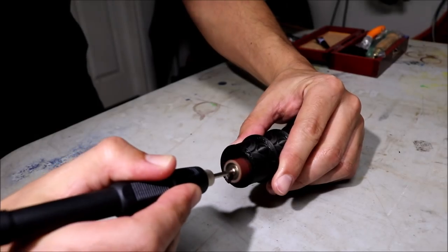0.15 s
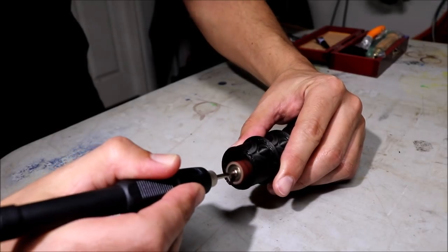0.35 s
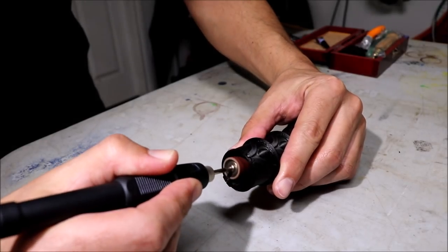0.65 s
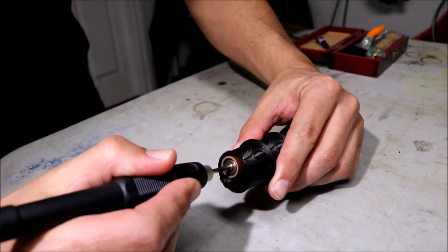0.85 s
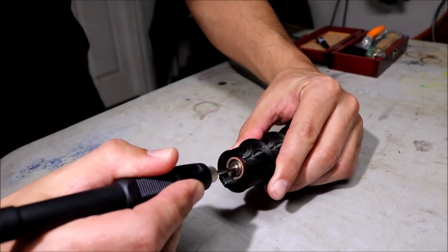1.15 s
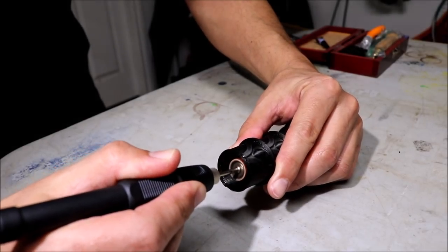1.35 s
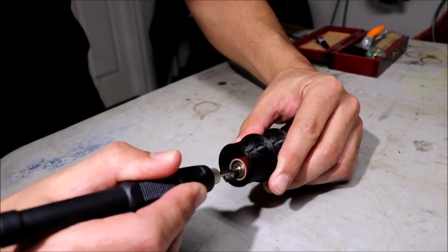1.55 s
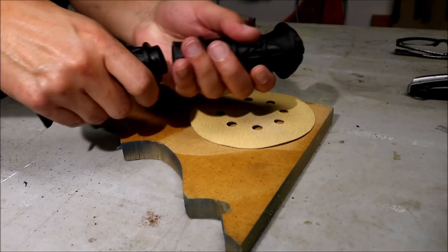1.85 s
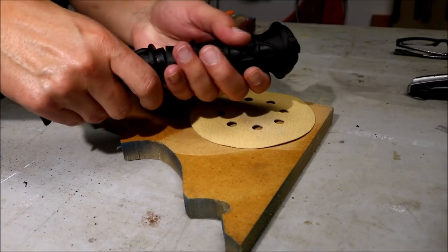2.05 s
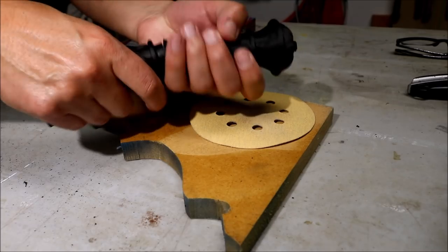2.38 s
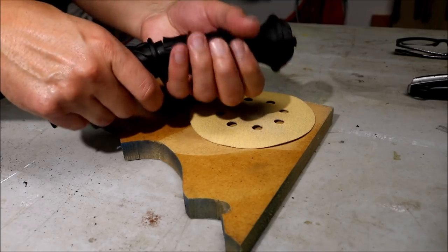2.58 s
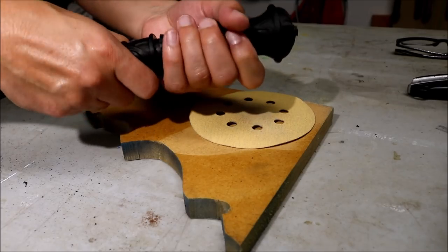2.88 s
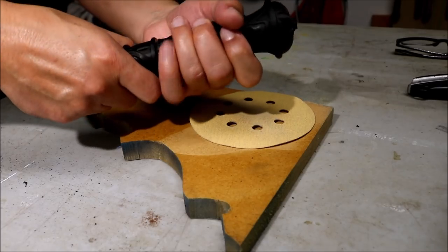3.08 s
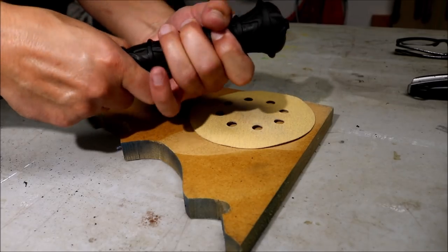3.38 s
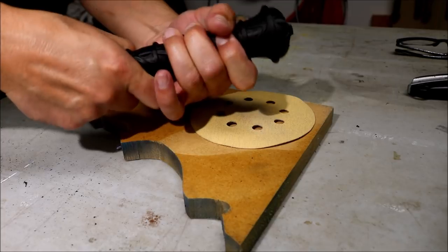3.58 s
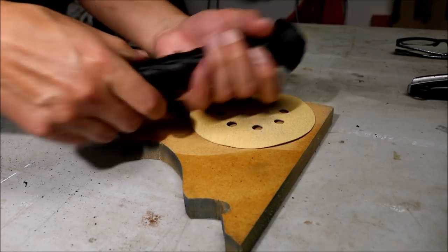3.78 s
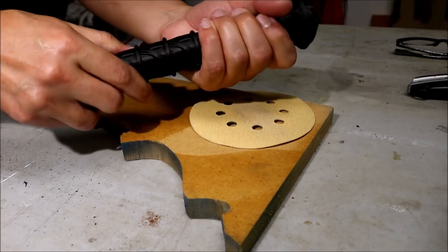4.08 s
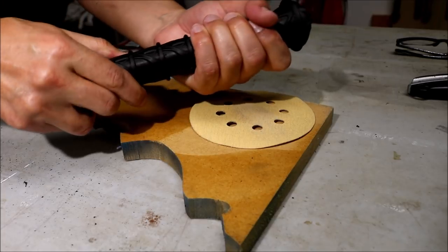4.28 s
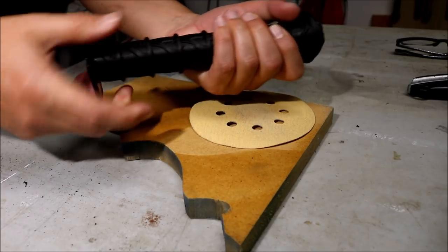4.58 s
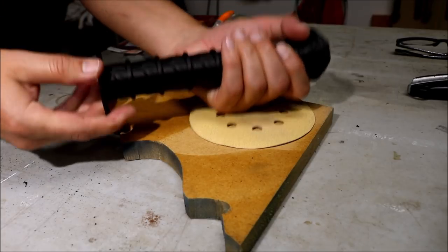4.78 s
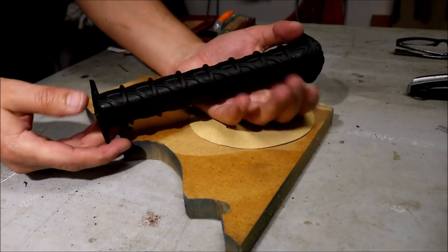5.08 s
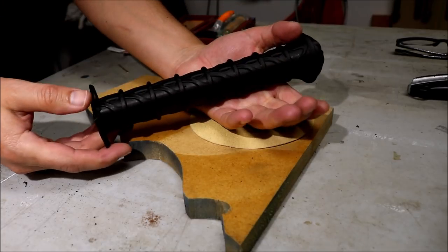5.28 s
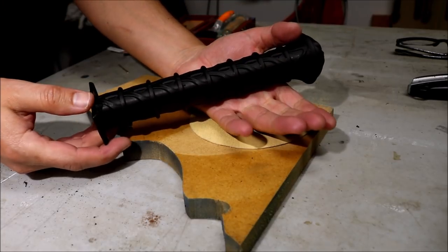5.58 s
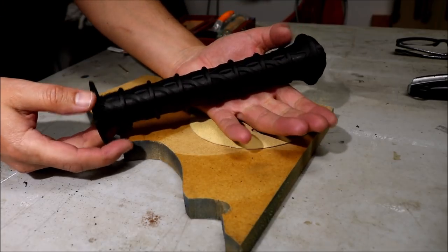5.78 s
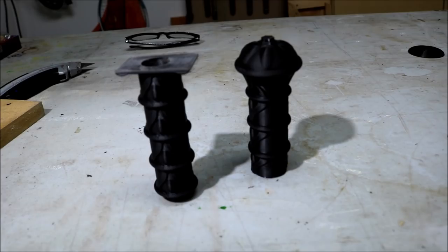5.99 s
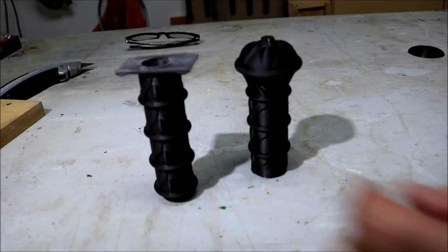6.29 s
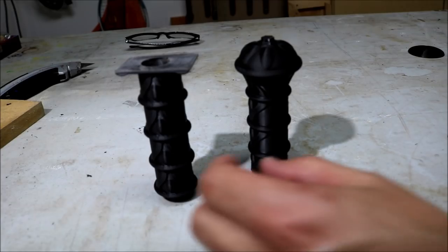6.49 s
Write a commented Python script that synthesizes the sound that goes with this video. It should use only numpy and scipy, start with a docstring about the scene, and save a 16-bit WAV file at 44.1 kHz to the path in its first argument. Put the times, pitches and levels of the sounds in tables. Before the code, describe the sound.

A rotary tool grinds inside a hollow plastic tube and slows under load, then hands rub and click tubes, then something hard bounces on a bench.

```python
"""A rotary tool grinds inside a hollow plastic tube and slows under load: drum blows and scouring ring the tube.
In a second scene hands twist and rub plastic tubes together, by stick-slip grains, small clicks and soft bumps.
In a third something hard is dropped on the bench: after a small first knock it bounces and rattles, its cracks
ringing the object and the bench.
Room noise with mains hum lies under all three, quieter in the first; the level dips briefly between scenes."""
import sys
import numpy as np
from scipy import signal
from scipy.fft import rfft, irfft
from scipy.io import wavfile
from scipy.ndimage import uniform_filter1d

SR = 44100
rng = np.random.default_rng(int(sys.argv[2]) if len(sys.argv) > 2 else 0)


def boost_factor(decibels):
    """Convert a level in decibels to a linear amplitude factor."""
    exponent = np.asarray(decibels, float) / 20
    return 10 ** exponent


def transcribe(u):
    """Save the signal u as a 16-bit wav file named by the first command-line argument.

    u: samples, shape (n,) or (channels, n), limited to [-1, 1]; the rate is SR.
    q: integer samples, one column per channel.
    """
    v = np.clip(np.atleast_2d(u).T, -1, 1)
    q = np.round(v * 32767).astype(np.int16)
    wavfile.write(sys.argv[1], SR, q)


N = 293039

# the scenes: (start [s], end [s], gain of room noise and hum [dB], extra gain of the second hum line [dB])
SCENES = [(-.1, 1.829, -9, 8.5), (1.862, 5.937, 3.5, -6), (5.969, 6.7, 5, 3)]


def rms_one(x):
    """Scale to rms 1."""
    return x / np.sqrt(np.mean(x ** 2) + 1e-20)


def in_time(rows):
    """Columns of a curve table, one value per sample."""
    s, *columns = np.transpose(rows)
    return [np.interp(np.arange(N) / SR, s, c) for c in columns]


def coloured(x, points):
    """Shape the spectrum by a (frequency [Hz], level [dB]) table, along log frequency."""
    size = x.shape[-1]
    hz = np.maximum(np.arange(size // 2 + 1) * SR / size, 1)
    table = np.array(points)
    gain_db = np.interp(np.log(hz), np.log(table[:, 0]), table[:, 1])
    return irfft(rfft(x) * boost_factor(gain_db), size)


def drift(rate, size=N):
    """Slow random wander: normal values of spread 1, drawn rate times a second and joined by lines."""
    steps = rng.standard_normal(int(size * rate / SR) + 2)
    return np.interp(np.arange(size) * rate / SR, np.arange(len(steps)), steps)


def resonances(x, table):
    """Parallel (centre [Hz], width [Hz], level [dB]) resonances, signs alternating."""
    out = 0
    for k, (hz, width, db) in enumerate(table):
        r = np.exp(-np.pi * width / SR)
        poles = [1, -2 * r * np.cos(2 * np.pi * hz / SR), r * r]
        band = signal.lfilter([(1 - r * r) / 2, 0, (r * r - 1) / 2], poles, x + 1e-18)
        out = out + (-1) ** k * boost_factor(db) * band
    return out


def ring(clicks, hz, t60):
    """A unit click sets a sine of initial height 1 ringing; it falls 60 dB in t60 seconds."""
    r = boost_factor(-60 / (t60 * SR))
    w = 2 * np.pi * hz / SR
    return signal.lfilter([0, np.sin(w)], [1, -2 * r * np.cos(w), r * r], clicks + 1e-18)


def clicks_at(times, sizes):
    """Single-sample blows."""
    out = np.zeros(N)
    out[np.round(np.asarray(times) * SR).astype(int)] = sizes
    return out


def grains(per_s, spread_db, size=N):
    """Random clicks of uneven size and either sign."""
    sizes = boost_factor(spread_db * np.minimum(rng.exponential(1, size), 4)) * rng.choice([-1, 1], size)
    return sizes * (rng.random(size) < per_s / SR)


def evened(x, span_s):
    """Level held at rms 1 over a sliding span."""
    return x / np.sqrt(uniform_filter1d(x ** 2, int(span_s * SR)) + 1e-14)


def gliding(x, hz, width):
    """A resonance whose centre moves, in blocks of 256 samples."""
    out, state = np.zeros_like(x), np.zeros(2)
    r = np.exp(-np.pi * width / SR)
    for i in range(0, len(x), 256):
        poles = [1, -2 * r * np.cos(2 * np.pi * hz[i] / SR), r * r]
        out[i:i + 256], state = signal.lfilter([1, 0, -1], poles, x[i:i + 256], zi=state)
    return out


def grinder():
    """The off-centre drum strikes the tube once a turn and scours it just after; the shaft hums its low orders."""
    # how hard the drum bites, as level of the tube: (time [s], level [dB])
    pressure = [(0.0, -23), (0.232, -23.5), (0.598, -22.5), (0.642, -26), (0.734, -20), (0.794, -26),
                (0.836, -18.5), (0.876, -24.5), (0.952, -22.5), (0.972, -25), (1.054, -23), (1.114, -29),
                (1.196, -24), (1.556, -25), (1.616, -22.5), (1.738, -25.5), (1.758, -23), (1.82, -30)]
    # shaft speed: (time [s], speed [turns/s])
    shaft_speed = [(0.0, 227), (0.034, 225.2), (0.3, 225.9), (0.476, 222), (0.7, 206.5), (0.81, 197.4),
                   (0.942, 180.2), (1.126, 173), (1.285, 165), (1.33, 165.9), (1.39, 162.4), (1.47, 162.7),
                   (1.612, 167.2), (1.698, 163.2), (1.77, 156), (1.83, 156.4)]
    # how the grip shares the pressure level among the rings:
    # (time [s], middle [dB], low [dB], second [dB], moving high ring centre [Hz])
    grip = [(0, -2, -13, -14, 3850), (.43, -5, -11, -13.5, 3810), (.5, 1.5, -11.5, -14.5, 3450),
            (.62, -1.5, -7.5, -12.5, 4050), (.73, -9, -13, -13.5, 3300), (.83, -6, -10, -9.5, 3770),
            (.93, -5, -8.5, -7.5, 3670), (1.04, -10, -9.5, -13.5, 3830), (1.27, -5, -5.5, -9.5, 4140),
            (1.4, -8, -8, -19, 3980), (1.53, -6, -11.5, -14.5, 3700), (1.6, -4.5, -12, -10, 3400),
            (1.82, -6.5, -7, -8.5, 3450)]
    # roughness of the cut: (time [s], unevenness of the blows [0-1], amount of steady scouring [0-1])
    cut_roughness = [(0, .5, .7), (.45, .35, .5), (.63, .25, .35), (.72, .5, .5), (1.1, .55, .5),
                     (1.22, .5, .45), (1.5, .55, .5), (1.58, .95, .3), (1.83, .95, .3)]
    # rings of the hollow tube, lowest to highest: (centre [Hz], width [Hz], level [dB])
    tube_low = [(904, 300, -6), (1320, 163, -1)]
    # second ring of the tube: (centre [Hz], width [Hz], level [dB])
    tube_second = [(1590, 300, -2.5), (1895, 91, 3.5)]
    # middle ring of the tube: (centre [Hz], width [Hz], level [dB])
    tube_mid = [(2288, 475, -4.5), (2775, 572, 0.5)]
    # fixed part of the high ring: (centre [Hz], width [Hz], level [dB])
    tube_high = [(3450, 1210, 1), (4006, 370, 7), (4450, 500, -4)]
    # shaft tone and overtones: (time [s], tone level [dB], second level [dB], third level [dB])
    shaft = [(0, -48.5, -45.5, -53), (.36, -44.5, -46, -48), (.56, -52.5, -43, -40.5),
             (.69, -40, -37, -39.5), (.77, -55.5, -43, -39), (1.0, -47.5, -50, -46.5),
             (1.32, -46, -45.5, -43.5), (1.4, -39, -49.5, -45), (1.56, -36.5, -46, -45),
             (1.63, -44, -48, -43.5), (1.8, -37, -48.5, -50)]
    # steady housing tones that do not follow the shaft: (frequency [Hz], level before wavering [dB])
    housing = [(775, -61), (998, -55)]
    # colour of the grinding hiss: (frequency [Hz], relative level [dB])
    hiss_colour = [(3060, -20.5), (5200, -3), (5870, -7.5), (6840, -1.5), (7000, 0), (7400, 2),
                   (7790, -3.5), (8840, -5.5), (14000, -11), (15800, -13)]
    ring_waver_db, ring_waver_per_s = 1.5, 22.0   # every ring wavers by itself, and so does the hiss

    n = 2 * SR
    bite_db, speed = in_time(pressure)[0][:n], in_time(shaft_speed)[0][:n]
    mid_db, low_db, second_db, high_hz = [c[:n] for c in in_time(grip)]
    uneven, scouring = [c[:n] for c in in_time(cut_roughness)]

    # one knock a turn, straying in time and strength
    turns = np.cumsum(speed) / SR
    strayed = turns + .035 * uneven ** 2 * drift(150, size=n)
    struck = np.flatnonzero(np.diff(np.floor(strayed)) > 0)
    knocks = np.zeros(n)
    knocks[struck] = boost_factor(3.5 * uneven[struck] * rng.standard_normal(1000)[:len(struck)])
    knocks = rms_one(knocks)

    # the drum's surface passes in the same order on every turn
    repeated = rng.standard_normal(96)[(turns % 1 * 96).astype(int)]
    grit = rms_one(grains(9000.0, spread_db=2.0, size=n))
    # every blow is followed by a couple of milliseconds of skidding
    skidding = rms_one(signal.lfilter([1], [1, -np.exp(-1 / (0.0018 * SR))], knocks))
    drive = knocks + 0.62 * (1.1 - uneven) * repeated + 0.14 * uneven * skidding * grit + scouring * grit

    # the two lower rings answer mostly to the blow
    high = rms_one(resonances(drive, tube_high)) + 0.92 * rms_one(gliding(drive, high_hz, 490.0))
    rings = [(-2.5, evened(high, 0.11)),
             (mid_db, evened(resonances(drive, tube_mid), 0.0515)),
             (second_db, evened(resonances(drive + 0.87 * knocks, tube_second), 0.0366)),
             (low_db, evened(resonances(drive + 2.3 * knocks, tube_low), 0.0264))]
    out = np.zeros(n)
    for db, x in rings:
        out += boost_factor(bite_db + db + ring_waver_db * drift(ring_waver_per_s, size=n)) * x

    for k, db in enumerate(in_time(shaft)):
        level = np.sqrt(2) * boost_factor(db[:n] + 2 * drift(17.76, size=n))
        out += level * np.sin(2 * np.pi * (k + 1) * turns)
    for hz, db in housing:
        level = np.sqrt(2) * boost_factor(db + 3.5 * drift(8, size=n))
        out += level * np.sin(2 * np.pi * hz * np.arange(n) / SR + drift(11, size=n))
    out = signal.sosfilt(signal.butter(4, 110.0, "high", fs=SR, output="sos"), out)

    # the hiss comes off the whole tool, so each side hears its own
    hiss = rng.standard_normal((2, n)) * (1 + .5 * skidding) + 0.042 * grit + 0.027 * knocks
    hiss = coloured(hiss, hiss_colour)
    # it loses 8.5 dB per octave as the shaft slows and follows part of the pressure's swing
    hiss_db = -27 + 8.5 * np.log2(speed / speed.max()) + .4 * (bite_db - bite_db.mean())
    hiss = boost_factor(hiss_db + ring_waver_db * drift(ring_waver_per_s, size=n)) * evened(hiss, 0.0166)
    tube = np.pad(out, (0, N - n)) * (np.arange(N) < SCENES[0][1] * SR)
    return tube, np.pad(hiss, ((0, 0), (0, N - n)))


def workshop():
    """Reflections, band by band: a quick scatter off the bench top, then the dying tail of the walls."""
    # reflections: (frequency [Hz], t60 [s], relative level [dB], left-right likeness [0-1])
    reflections = [(100, 1, -6.5, 1), (407, 0.38, -1.5, 0.82), (1540, 0.35, -2.5, 0.093),
                   (5000, 0.49, -1, 0.015), (12000, 0.11, -3.5, 0.016)]
    t, tail = np.arange(SR) / SR, 0
    hz, *columns = np.transpose(reflections)
    for low in 60 * 2.0 ** np.arange(8):   # octave bands
        t60, db, alike = [np.interp(np.log(low * np.sqrt(2)), np.log(hz), c) for c in columns]
        octave = signal.butter(2, [low, 2 * low], "band", fs=SR, output="sos")
        mid, side = signal.sosfilt(octave, rng.standard_normal((2, SR)))
        alike = np.clip(alike, 0, .99)
        band = np.sqrt(1 + alike) * mid + np.sqrt(1 - alike) * side * [[1], [-1]]
        walls = boost_factor(-60 * t / t60) * np.clip(t / 0.00075, 0, 1) / np.sqrt(t60)
        scatter = 9.6 * np.exp(-t / 0.0022)
        tail = tail + boost_factor(db) * band * (walls + scatter)
    return tail / np.sqrt(SR) * 3.61


def room_tone():
    """Steady noise, more alike left and right in the bass, and the wavering lines of a mains hum."""
    # colour of the room noise: (frequency [Hz], relative level [dB])
    noise_colour = [(18, -40), (35, -16), (58, -3.5), (134, -2.5), (228, -2), (367, -6), (499, -8),
                    (1120, -10.5), (1810, -14.5), (2020, -13.5), (3950, -16.5), (4540, -18.5),
                    (6180, -18.5), (16000, -28)]
    # left-right likeness of the noise: (frequency [Hz], likeness [0-1])
    noise_likeness = [(60, 0.52), (180, 0.52), (550, 0.24), (1650, 0.063), (4970, 0.024), (15000, 0.04)]
    # hum lines: (frequency [Hz], level before wavering and scene gains [dB])
    hum_lines = [(59.2, -70.5), (118.4, -63), (382.2, -74.5)]
    mid, side = coloured(rng.standard_normal((2, N)), noise_colour)
    hz, alike = np.transpose(noise_likeness)
    mid = coloured(mid, np.c_[hz, 10 * np.log10(1 + alike)])
    side = coloured(side, np.c_[hz, 10 * np.log10(1 - alike)])
    noise = boost_factor(-57) * rms_one(mid + side * [[1], [-1]])
    t = np.arange(N) / SR
    hum = []
    for line_hz, db in hum_lines:
        level = np.sqrt(2) * boost_factor(db + 4 * drift(9))
        hum.append(level * np.sin(2 * np.pi * line_hz * t + drift(10)))
    return noise, hum


def hands_and_first_knock():
    """Stick-slip grains sound through the held tube, its modes wavering; clicks, bumps and a knock are damped rings."""
    # rubbing strokes: (time [s], length [s], tube body level [dB], bright rasp level [dB])
    rubs = [(2.009, 0.052, -53.5, -59.5), (2.097, 0.039, -66, -58.5), (2.196, 0.039, -60, -58),
            (2.349, 0.2, -57, -60.5), (2.657, 0.031, -60, -74), (2.746, 0.07, -54.5, -60.5),
            (2.812, 0.067, -54.5, -60), (2.883, 0.045, -49, -57), (2.958, 0.055, -52, -58),
            (3.058, 0.026, -51.5, -60), (3.325, 0.02, -65, -61), (3.4, 0.043, -65, -64),
            (3.73, 0.03, -57, -68.5), (3.756, 0.055, -57, -58), (3.819, 0.018, -46, -66),
            (3.837, 0.02, -44.5, -72), (3.877, 0.035, -42, -66), (3.908, 0.045, -39.5, -67),
            (3.942, 0.044, -49, -69), (3.974, 0.1, -55, -67), (4.215, 0.024, -66, -59),
            (4.511, 0.14, -58.5, -70), (4.872, 0.036, -60.5, -57), (5.067, 0.028, -59, -67),
            (5.913, 0.027, -61, -56.5)]
    # modes of the held tube: (centre [Hz], width [Hz], level [dB])
    tube_modes = [(2390, 120, -2), (2930, 330, -5.5), (3420, 410, 7), (4030, 240, 1), (4440, 490, -14)]
    # bright skin rasp: (centre [Hz], width [Hz], level [dB])
    rasp_modes = [(5080, 880, 12), (6570, 1400, 11), (8000, 1200, -18), (12200, 6300, -20)]
    # dull ring of the cupped hand, goes with the rasp: (centre [Hz], width [Hz], level [dB])
    palm_modes = [(660, 170, -4), (1050, 300, -9)]
    # small clicks of the tubes, and last the first knock of the dropped object:
    # (time [s], level [dB], pitch [Hz])
    small_clicks = [(2.1181, -42, 4170), (2.181, -43.5, 4090), (2.2128, -41, 3570), (2.75, -44, 3480),
                    (2.9858, -36, 3500), (3.081, -34.5, 3450), (3.192, -33.5, 3440), (3.226, -32.5, 3520),
                    (3.3037, -38.5, 3400), (3.327, -27, 3550), (3.4042, -42, 3100), (3.5327, -32.5, 2970),
                    (3.7602, -38, 3860), (3.8817, -37, 3350), (4.2193, -42, 2850), (4.5645, -39, 3620),
                    (4.8888, -39, 4400), (6.1787, -38, 3580)]
    # soft bumps of the hands: (time [s], relative level [dB], base pitch [Hz], base t60 [s])
    bumps = [(2.013, -43, 785, 0.041), (2.034, -38.5, 924, 0.036), (2.212, -49, 650, 0.04),
             (2.449, -48, 620, 0.06), (3.189, -45.5, 424, 0.043), (3.225, -38.5, 410, 0.04),
             (3.327, -45, 392, 0.08), (4.898, -38.5, 91.5, 0.09), (5.04, -32, 381.6, 0.16)]
    # modes of each bump: (pitch ratio, level [dB], t60 ratio)
    bump_modes = [(.404, -10, 2), (.8, -7, 1.23), (1.0, -0.5, .9), (1.25, -15, 1.2)]

    body, rasp = np.zeros((2, N))
    for s, length, body_db, rasp_db in rubs:
        at, part = int(s * SR), np.linspace(0, 1, int(length * SR))
        # quick rise, then a fall over the last 42 % of the stroke
        stroke = np.minimum(1, np.minimum(part / 0.036, (1 - part) / 0.42))
        body[at:at + len(part)] += boost_factor(body_db) * stroke
        rasp[at:at + len(part)] += boost_factor(rasp_db) * stroke

    slips = grains(7000.0, spread_db=3.5) * boost_factor(3 * drift(110))
    # the tube's modes come and go with the grip
    held = sum(boost_factor(2.5 * drift(14)) * resonances(slips, [mode]) for mode in tube_modes)
    out = body * rms_one(held)
    bright = sum(boost_factor(2 * drift(14)) * resonances(slips, [mode]) for mode in rasp_modes)
    out += rasp * rms_one(bright)
    out += rasp * boost_factor(-6.5 + 1.8 * drift(5.68)) * rms_one(resonances(slips, palm_modes))

    for s, db, hz in small_clicks:
        at = int(s * SR)
        click = boost_factor(db) * np.eye(1, 1500)[0]   # a single sample
        snap = signal.lfilter([1, -1], [1, -.1], click)
        out[at:at + 1500] += ring(click, hz, 0.0077) + ring(click, 1.33 * hz, 0.0016) + snap
    for s, db, hz, t60 in bumps:
        at = int(s * SR)
        bump = signal.lfilter([1], [1, -.7], boost_factor(db - 11.0) * np.eye(1, 8000)[0])   # softened click
        for ratio, mode_db, longer in bump_modes:
            out[at:at + 8000] += boost_factor(mode_db) * ring(bump, ratio * hz, longer * t60)
    return out


def drop():
    """Each blow is a sharp crack that rings the object and the bench below; it rattles on in between."""
    # blows on the bench: (time [s], relative crack level [dB], relative bench thud level [dB])
    blows = [(6.2667, -4.5, -36), (6.334, -28, -15.5), (6.3649, -2.5, -36), (6.4068, -12, -46),
             (6.4297, -21, -39), (6.465, -28, -24), (6.4897, -25, -25)]
    # modes of the dropped object: (frequency [Hz], relative level [dB], t60 [s])
    object_modes = [(1490, 3.5, 0.013), (1690, -18, 0.012), (2656, 4.5, 0.011), (2940, 0, 0.0029),
                    (4070, -1.5, 0.0027), (5270, -7.5, 0.0048), (7100, -13, 0.0061)]
    # modes of the bench: (frequency [Hz], relative level [dB], t60 [s])
    bench_modes = [(208.4, -5, 0.25), (302, -1, 0.082), (407, -2.5, 0.14), (472, -2.5, 0.16),
                   (701, -11, 0.097)]
    # rattling between and after the blows: (time [s], level [dB])
    rattle = [(6.27, -35), (6.308, -28), (6.428, -27.5), (6.64, -41.5)]
    # colour of the rattling: (frequency [Hz], relative level [dB])
    rattle_colour = [(60, -40), (140, -24), (205, -0.5), (500, -2.5), (850, -9), (1200, -3), (1500, -6),
                     (1950, -22), (2400, -3), (3000, -9.5), (3500, -17), (4700, -19.5), (9200, -33),
                     (16000, -56)]

    s, db, thud_db = np.transpose(blows)
    # every blow excites the modes a little differently
    scatter = rng.standard_normal((len(s), len(object_modes) + len(bench_modes)))
    out = signal.lfilter([1, -1], [1, -.4], clicks_at(s, boost_factor(db - 23.0)))
    # splintery noise that dies within a few milliseconds
    decay = signal.lfilter([1], [1, -np.exp(-1 / (0.0023 * SR))], clicks_at(s, boost_factor(db - 24.0)))
    out += signal.lfilter([.5], [1, -.55], decay * rng.standard_normal(N))
    for k, (hz, level_db, t60) in enumerate(object_modes):
        out += ring(clicks_at(s, boost_factor(db + level_db - 7.5 + 4.5 * scatter[:, k])), hz, t60)
    for k, (hz, level_db, t60) in enumerate(bench_modes):
        out += ring(clicks_at(s, boost_factor(thud_db + level_db - 6.0 + 2.4 * scatter[:, -1 - k])), hz, t60)
    chatter = rms_one(coloured(grains(2500.0, spread_db=3.0), rattle_colour))
    return out + chatter * boost_factor(in_time(rattle)[0]) * (np.arange(N) > rattle[0][0] * SR)


def placed(x, room, wet_db, pan_db, lag):
    """Direct sound, left louder by pan_db and later by lag samples, plus the room's reflections."""
    direct = np.array([np.roll(x, lag), x]) * boost_factor(pan_db * np.array([[.5], [-.5]]))
    return direct + boost_factor(wet_db) * signal.fftconvolve(x[None], room, axes=1)[:, :N]


def scene():
    """All sources in the room; the levels of noise and hum change with each scene."""
    noise, hum = room_tone()
    room = workshop()
    which = np.searchsorted([end for start, end, *gains in SCENES], np.arange(N) / SR)
    tone_db, hum_db = np.array(SCENES)[which, 2:].T
    tube, hiss = grinder()
    tool = placed(tube, room, wet_db=-5.0, pan_db=-3.0, lag=-1) + hiss
    tool *= np.arange(N) < (SCENES[0][1] + .02) * SR
    near = placed(hands_and_first_knock(), room, wet_db=-6.5, pan_db=-2.0, lag=-1)
    fall = placed(drop(), room, wet_db=-5.5, pan_db=-4.0, lag=5)
    fall = signal.sosfilt(signal.butter(2, 120.0, "high", fs=SR, output="sos"), fall)
    background = noise + hum[0] + hum[2] + boost_factor(hum_db) * hum[1]
    return tool + near + fall + boost_factor(tone_db) * background


def band_limit(x):
    """A steep low-pass at the top of the band."""
    return signal.sosfilt(signal.butter(12, 16470, fs=SR, output="sos"), x)


def record(dry):
    """Microphones differ in colour; short fades part the scenes; peaks are clipped; the top is cut."""
    # left minus right of the two microphones: (frequency [Hz], level [dB])
    mic_tilt = np.array([(60, -1), (180, 1.5), (550, 2.5), (1650, 1), (4970, 0.5), (15000, 3.5)])
    left = coloured(dry[0], mic_tilt * [1, .5])
    right = coloured(dry[1], mic_tilt * [1, -.5])
    t = np.arange(N) / SR
    fades = [np.minimum((t - start) / .006, (end - t) / 0.0067) * 41.0 for start, end, *gains in SCENES]
    open_db = np.clip(np.max(fades, axis=0), -36.0, 0)
    clipped = np.clip(np.array([left, right]) * boost_factor(open_db), -1, 1)
    mix = signal.sosfilt(signal.cheby2(12, 50, 16300, fs=SR, output="sos"), clipped)
    return band_limit(mix)


dry = scene()
out = record(dry)
transcribe(out)
```